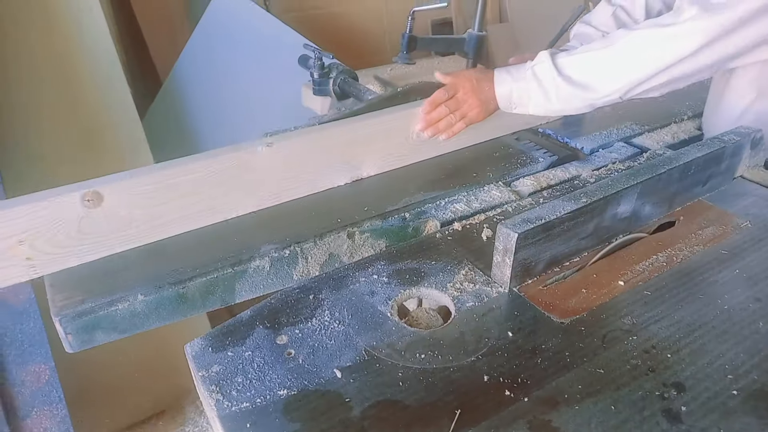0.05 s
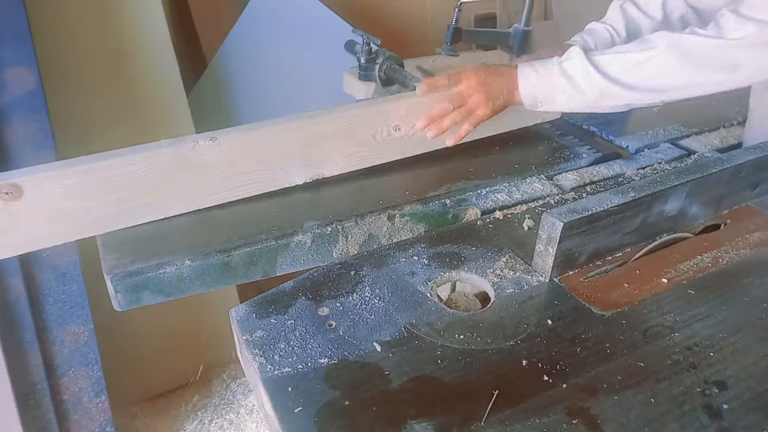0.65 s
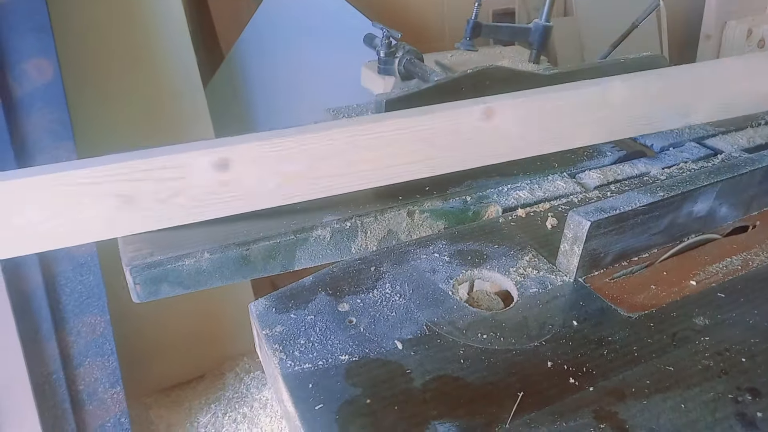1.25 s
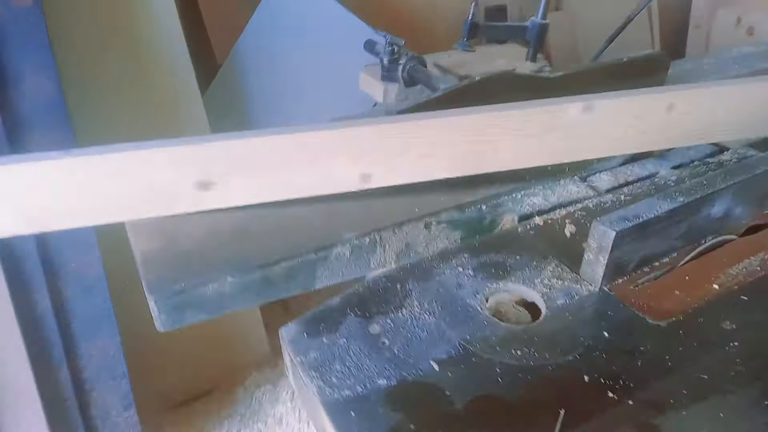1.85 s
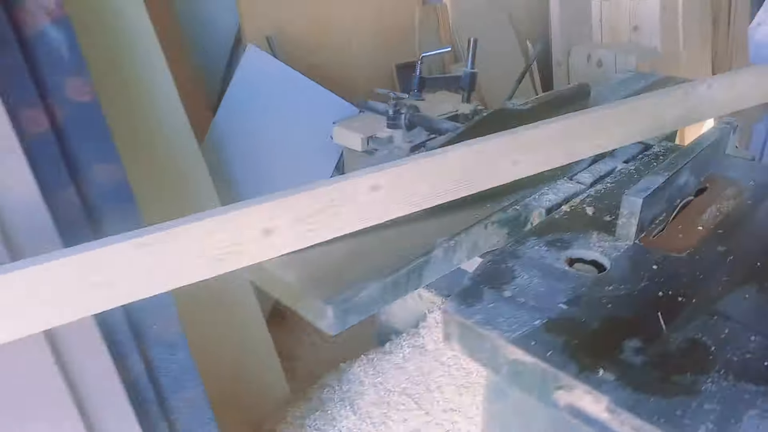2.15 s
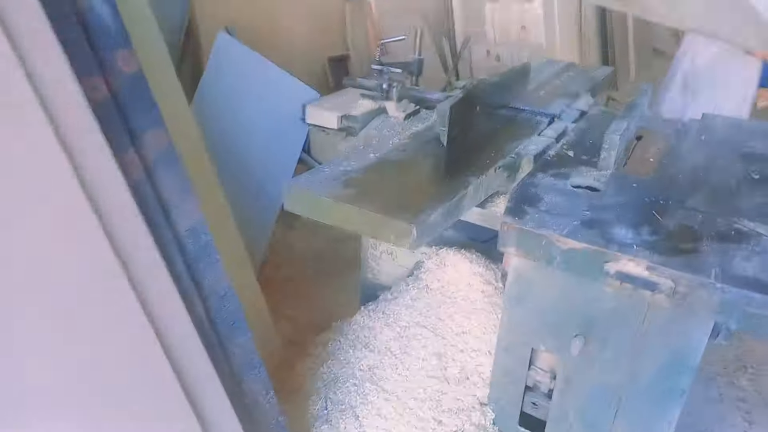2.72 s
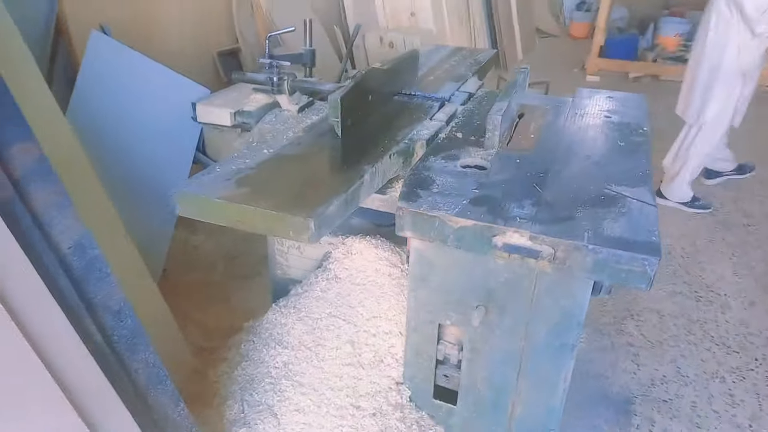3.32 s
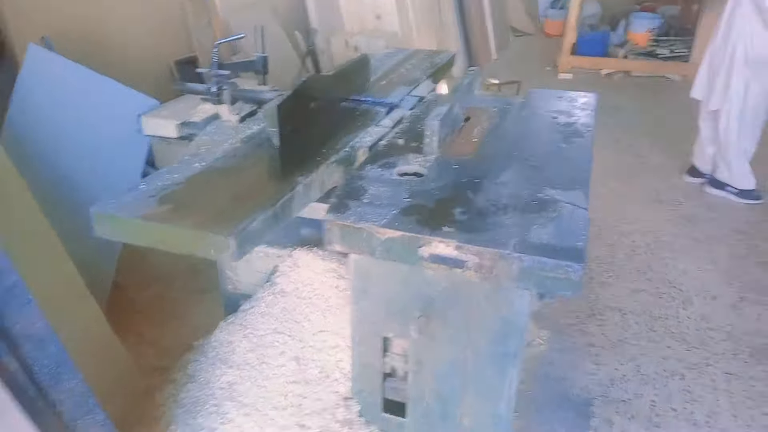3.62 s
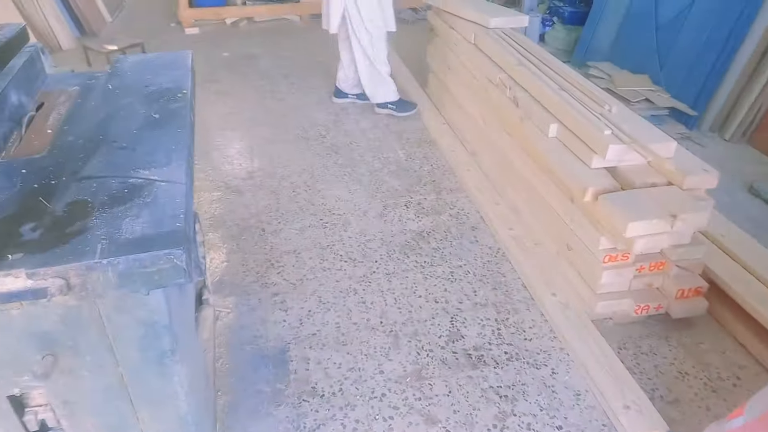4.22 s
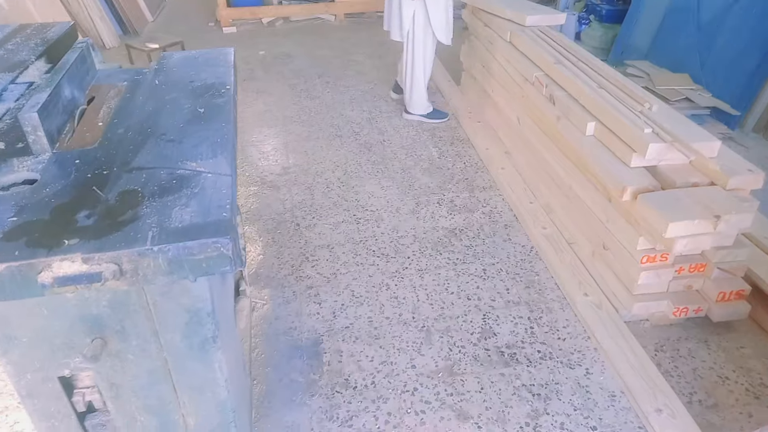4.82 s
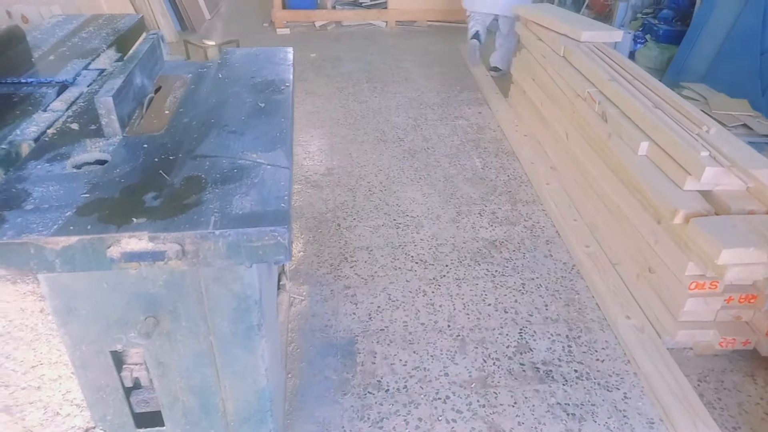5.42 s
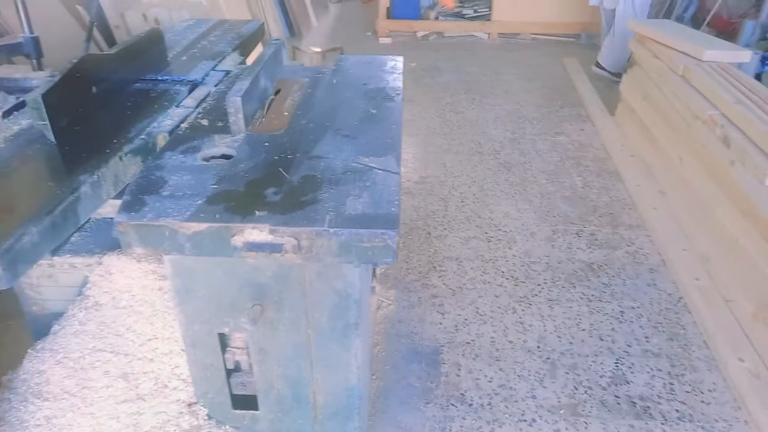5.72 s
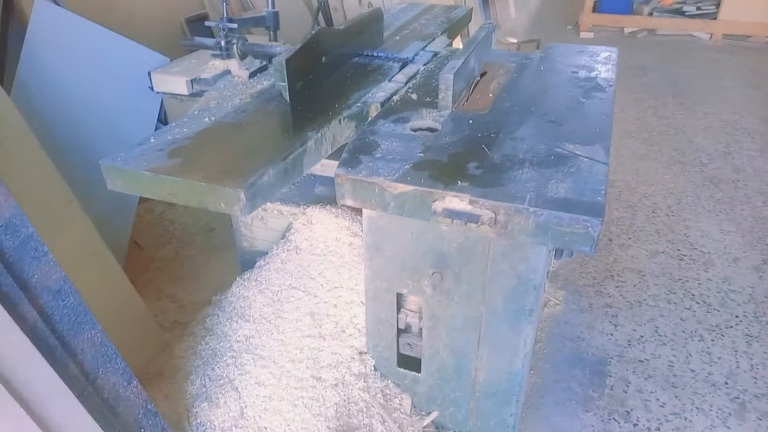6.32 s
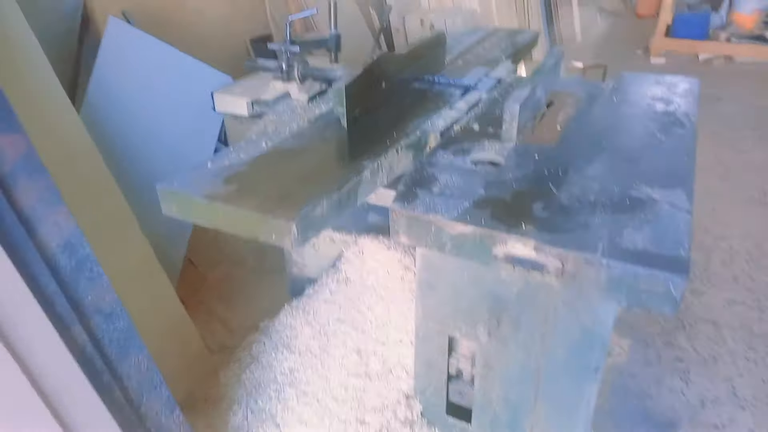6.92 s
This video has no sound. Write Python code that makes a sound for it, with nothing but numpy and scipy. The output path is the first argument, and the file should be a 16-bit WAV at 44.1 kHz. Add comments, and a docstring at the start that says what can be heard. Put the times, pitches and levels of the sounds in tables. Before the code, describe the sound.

A short buzzing cut on a workshop planer gives way to a steady motor hum and whir, broken by one sharp wooden clatter.

```python
"""A belt-driven planer in a workshop. First its knives chop the last of a plank: shearing, chatter, chips.
Air then roars in the gap under the wood and whistles as it is lifted off. The cutterhead hums on,
with whining bearings and a rumbling drive. At 4.1 s the plank clatters onto the floor; near the end,
timber clicks further away. A gain control ducks the hum under the cut and the clatter."""
import sys
import numpy as np
from scipy import signal
from scipy.fft import rfft, irfft
from scipy.io import wavfile
from scipy.ndimage import uniform_filter1d, minimum_filter1d

SR = 44100
rng = np.random.default_rng(int(sys.argv[2]) if len(sys.argv) > 2 else 0)


def unload_wav(signal):
    """Save mono or channel-first audio to the path in sys.argv[1] as 16-bit WAV at rate SR, clipped to [-1, 1]."""
    wavfile.write(
        sys.argv[1],
        SR,
        np.round(np.clip(np.atleast_2d(signal).T, -1, 1) * 32767).astype(np.int16),
    )


N = 310930
TIME = np.arange(N) / SR

# cutterhead rotation: t/s, f/Hz
HEAD_SPEED = [(0, 96.08), (.38, 96.1), (.6, 96.3), (4, 96.35), (5.5, 96.45), (7.05, 96.3)]
# plank over the cutterhead: t/s, cover/0-1
PLANK_COVER = [(.45, 0.98), (.6, 0.86), (.85, 0.6), (1.1, 0.8), (1.35, 0.93), (1.7, 1), (2, 0.44),
               (2.3, 0.3), (2.6, 0.03)]
# the listener moves and turns, so the slot faces toward and away: t/s, right-ear delay/ms, beam level/dB
ASPECT = [(2.1, .05, 2.5), (2.35, 0.058, -4.5), (2.7, 0.24, 1), (3.25, 0.22, -3.5), (3.9, 0.26, -1),
          (5.2, 0.35, 1), (6.2, 0.13, 0), (7.05, 0.19, -0.5)]
# left-right likeness: f/Hz, coherence/0-1
COHERENCE = [(25, 0.13), (70, 0.56), (300, 0.78), (600, 0.35), (1100, 0.064), (2500, 0.13), (5000, 0.043),
             (16000, 0.21)]
# ringing wood: f/Hz, level/dB
WOOD_SPECTRUM = [(250, -22), (650, -3), (1100, -2.5), (1700, -1.5), (2400, 0.5), (3000, -14), (3700, -22),
                 (4800, -32), (6400, -32), (7500, -44), (16000, -45)]
# chip spray and splinters: f/Hz, level/dB
SPRAY_SPECTRUM = [(2000, -8), (6500, 1.5), (7500, -20.5), (9500, -17), (12000, -11.5), (13600, -12),
                  (15500, 5.5), (16000, 2)]


def from_db(db):
    """Decibels to gain."""
    return 10 ** (np.asarray(db) / 20)


def unit_rms(x):
    """Scale to rms 1."""
    return x / np.sqrt(np.mean(x ** 2) + 1e-20)


def in_time(rows):
    """Each value column of a time table, per sample."""
    t_s, *columns = np.transpose(rows)
    return [np.interp(TIME, t_s, column) for column in columns]


def envelope(levels, trim_db=0):
    """Gain per sample from a level table."""
    return from_db(in_time(levels)[0] + trim_db)


def at_hz(points, hz):
    """Interpolate over log frequency."""
    f_hz, value = np.transpose(points)
    return np.interp(np.log(np.maximum(hz, 1)), np.log(f_hz), value)


def drift(rate_hz):
    """Smooth random wander, rms 1."""
    hop, settle = 40, 2000
    pole = np.exp(-2 * np.pi * rate_hz * hop / SR)
    slow = signal.lfilter([1], [1, -2 * pole, pole * pole], rng.standard_normal(N // hop + settle + 2))
    slow = unit_rms(slow[settle:])
    return np.interp(np.arange(N) / hop, np.arange(len(slow)), slow)


def pan_gains(hz):
    """Left and right gains by frequency."""
    # f/Hz, left minus right/dB
    balance = [(25, -4.5), (120, 2.5), (300, -1), (600, 2.5), (1200, 1.5), (2500, 0), (5000, 3),
               (9000, 2.5), (15000, -5)]
    return from_db(at_hz(balance, hz) * np.array([[.5], [-.5]]))


def coloured(pair, spectrum):
    """Two unrelated signals to shaped stereo, diffuse in the treble; rms 1."""
    hz = np.arange(N // 2 + 1) * SR / N
    alike = at_hz(COHERENCE, hz)
    mid, side = rfft(pair)
    stereo = np.sqrt(1 + alike) * mid + np.sqrt(1 - alike) * side * [[1], [-1]]
    return unit_rms(irfft(stereo * pan_gains(hz) * from_db(at_hz(spectrum, hz)), N))


def noise(spectrum):
    """Shaped stereo noise, rms 1."""
    return coloured(rng.standard_normal((2, N)), spectrum)


def resonance(hz, width_hz):
    """One resonance driven by turbulence or friction; rms 1."""
    b, a = signal.iirpeak(hz, hz / width_hz, fs=SR)
    return unit_rms(signal.lfilter(b, a, signal.lfilter(b, a, rng.standard_normal((2, N)))))


def tone(phase, hz, flutter, flutter_hz, spread, sway_db=0.2):
    """Fluttering line; standing waves in the room set its phase and sway it between the ears."""
    shared = 1 + flutter * (drift(flutter_hz) + 1j * drift(flutter_hz))
    diffuse = np.sqrt(1 - at_hz(COHERENCE, hz)) * np.array([[1], [-1]])
    sway = from_db(sway_db * diffuse * drift(1.0))
    skew_rad = 1.33 * spread * diffuse * drift(0.8)
    carrier = np.exp(1j * (phase + skew_rad + 2 * np.pi * rng.random()))
    return unit_rms(np.real(shared * sway * carrier) * pan_gains(hz))


def burst_power(start_s, db, t60_s, attack_s=.002):
    """Power of a blow: fast rise, exponential decay."""
    age_s = np.maximum(TIME - start_s, 0)
    attack = np.minimum(age_s / attack_s, 1)
    return (attack * from_db(db) * np.exp(-np.log(1000) * age_s / t60_s)) ** 2


def half_open(peak_cover=0.43, cover_width=0.13):
    """Ringing of the gap as the plank lifts, 0-1."""
    cover, = in_time(PLANK_COVER)
    return np.exp(-((cover - peak_cover) / cover_width) ** 2)


def from_the_left(x):
    """Sound from the left reaches the right ear later."""
    delay_s = in_time(ASPECT)[0] / 1000
    return np.array([x[0], np.interp(TIME - delay_s, TIME, x[1])])


def rumble():
    """A low mono rumble swells briefly."""
    # t/s, level/dB
    swell = [(4.8, -55), (5.25, -17.5), (5.85, -21.5), (6.4, -57)]
    return envelope(swell) * resonance(hz=134, width_hz=83)[0]


def drive():
    """Belt, pulleys and motor shake the frame at their own steady rates."""
    # f/Hz, relative level/dB
    drive_lines = [(24, -21.5), (33.3, -5), (48.4, -7), (69.5, -20.5), (73.3, -6), (121, -21),
                   (144.5, -11.5), (311, -14.5), (348.6, -16.5), (623, -19.5)]
    # frame shaking: t/s, level/dB
    shake = [(.3, -11), (.75, -28), (1.1, -17.5), (2.2, -17.5), (3.4, -13), (4.7, -19.5), (5.3, -13.5),
             (5.9, -17.5), (7.05, -17.5)]
    lines = sum(from_db(db) * tone(2 * np.pi * hz * TIME, hz, flutter=0.1, flutter_hz=3.1, spread=0.99)
                for hz, db in drive_lines)
    return envelope(shake, trim_db=-.3) * lines


def whine(hz, orders, levels, wobble_hz, surge_db=3.0, cage_hz=6.9):
    """Rolling balls sing a series of lines that waver together and surge as the cage turns."""
    phase = 2 * np.pi * np.cumsum(hz + wobble_hz * drift(2.4)) / SR
    lines = sum(from_db(db) * tone(k * phase, k * hz, flutter=0.2, flutter_hz=22, spread=0.22, sway_db=3.5)
                for k, db in orders)
    surge = from_db(surge_db * np.sin(2 * np.pi * cage_hz * TIME + drift(5.3)))
    return envelope(levels) * surge * lines


def bearing_whistle(hz, levels, halo_db, halo_hz, halo_width_hz):
    """One bearing line stands out, with a narrow breathy resonance beside it."""
    line = tone(2 * np.pi * hz * TIME, hz, flutter=0.095, flutter_hz=13, spread=0.25, sway_db=4)
    return envelope(levels) * (line + from_db(halo_db) * resonance(halo_hz, halo_width_hz))


def bearings(front_hz=391.4, rear_hz=348.7):
    """Both bearings whine; single lines swell on their own."""
    # whine series: order, relative level/dB
    front_orders = [(4, -12.5), (5, -6), (7, -1.5), (8, -8)]
    rear_orders = [(5, -4.5), (6, -2), (7, -0.5), (14, -7)]
    # whole series: t/s, level/dB
    front_whine = [(0, -37), (.8, -36), (1.7, -35), (1.95, -37), (2.6, -52)]
    rear_whine = [(1.8, -49), (2.1, -40), (2.5, -41), (2.75, -40), (3.15, -40), (3.5, -46), (3.7, -39),
                  (5.2, -44), (5.5, -61)]
    # single lines: t/s, level/dB
    front_line = [(.5, -48), (1.12, -37), (1.25, -31.5), (1.4, -47), (1.5, -30), (1.75, -31), (1.84, -31),
                  (1.93, -61), (2.4, -64)]
    rear_line = [(.5, -47), (1.05, -39), (1.4, -40), (1.9, -48), (2.3, -46), (2.6, -41), (2.85, -33),
                 (3.45, -33.5), (3.65, -39), (3.82, -35), (4, -40), (4.45, -37), (4.7, -41), (5.2, -37),
                 (5.35, -55)]
    upper_line = [(1.6, -53), (2.1, -41.5), (2.45, -45), (2.75, -38), (3.1, -41), (3.35, -34), (3.52, -39),
                  (3.65, -50), (5.2, -48), (5.5, -60)]
    front = whine(front_hz, front_orders, front_whine, wobble_hz=0.344)
    rear = whine(rear_hz, rear_orders, rear_whine, wobble_hz=0.297)
    front += bearing_whistle(6 * front_hz, front_line, halo_db=-12.5, halo_hz=2420, halo_width_hz=40)
    rear += bearing_whistle(8 * rear_hz, rear_line, halo_db=-2.5, halo_hz=2776, halo_width_hz=32)
    top_hz = 10 * rear_hz
    upper = tone(2 * np.pi * top_hz * TIME, top_hz, flutter=0.19, flutter_hz=13, spread=0.28, sway_db=2.5)
    return front + rear + envelope(upper_line) * upper


def air_whistle(half_open_db=-34):
    """Air whistles under the plank, most with the gap half open, and rings the guard and tables."""
    # covered gap: t/s, level/dB
    gap_level = [(.35, -50), (.5, -38), (.85, -47), (1.15, -49), (1.35, -35), (1.9, -35), (2.5, -53)]
    # guard and tables: f/Hz, width/Hz, level/dB
    table_modes = [(3024, 50, -48.5), (3590, 28, -47.5), (5350, 70, -50.5)]
    gap = (envelope(gap_level) + from_db(half_open_db) * half_open()) * resonance(hz=836, width_hz=16)
    return gap + sum(from_db(db) * resonance(hz, width_hz) for hz, width_hz, db in table_modes)


def air_roar(turn_rad, free_db=-18, trapped_db=-22, treble_db=-24.5):
    """Air puffs with each turn, roars under the plank and hisses up to 7 kHz. Apart from the air, a faint thin
    sizzle sits at 14-16 kHz."""
    # open head, gap under the plank: f/Hz, level/dB
    roar_spectrum = [(15, -29.5), (40, -2), (100, 6.5), (135, -1.5), (260, -0.5), (400, -3.5), (540, -4),
                     (680, -11), (900, -9.5), (1250, -11.5), (1600, -25), (4000, -61.5)]
    gap_spectrum = [(100, 2.5), (170, -1.5), (270, -2), (350, -6), (430, 0.5), (540, -7), (660, -12.5),
                    (750, -8), (810, -3), (900, -12.5), (1200, -11), (1600, -41), (4000, -56.5)]
    # hiss up to 7 kHz, and a faint thin sizzle at 14-16 kHz: f/Hz, level/dB
    treble_spectrum = [(300, -9.5), (1100, -0.5), (1500, 0), (2300, 1), (2800, -1.5), (3300, -4),
                       (4200, -4), (4750, -10), (4950, -5), (5150, -8.5), (5900, -7.5), (6600, -15.5),
                       (7300, -38.5), (13800, -30), (15000, -23), (16000, -19)]
    # inrush as the wood clears the knives: t/s, level/dB
    rush_level = [(.37, -50), (.42, -21), (.53, -15.5), (.62, -22), (.72, -46)]
    cover, = in_time(PLANK_COVER)
    boost_db = 8.5 * cover
    swing_db = 0.5 * cover + 0.4 * in_time(ASPECT)[1]
    puffs = 1 + 0.091 * np.cos(turn_rad) + 0.067 * np.sin(2 * turn_rad) - 0.13 * np.cos(3 * turn_rad)
    free = np.sqrt(1 - cover) * from_db(free_db + boost_db) * noise(roar_spectrum)
    trapped = np.sqrt(cover) * from_db(trapped_db + boost_db) * noise(gap_spectrum)
    hiss_and_sizzle = from_db(treble_db + swing_db + .5 * drift(5.5)) * noise(treble_spectrum)
    rush = envelope(rush_level) * noise(roar_spectrum)
    return (free + trapped + rush + hiss_and_sizzle) * unit_rms(puffs)


def cutterhead(turn_rad, beam_above_hz=430):
    """Imbalance drones once a turn; three knives pass the table lips, adding orders the plank colours."""
    # orders 1, 3 and 5: t/s, level/dB
    drone_level = [(.25, -18.5), (.6, -16), (.8, -17.5), (1.13, -22), (1.27, -16), (1.4, -25),
                   (1.65, -21.5), (1.88, -17), (2.8, -20.5), (4.4, -22.5), (5.3, -16), (5.45, -32),
                   (5.8, -14), (5.95, -30), (6.02, -12), (6.35, -16.5), (6.44, -24), (6.57, -19)]
    knife_level = [(.1, -23.5), (.5, -23), (1.2, -32), (1.35, -22.5), (1.65, -35), (1.75, -21.5),
                   (1.95, -22.5), (2.35, -15.5), (3.2, -23.5), (3.7, -16), (4.05, -17), (4.4, -18),
                   (5.6, -17.5), (7.05, -20)]
    fifth_level = [(.1, -28), (.45, -23), (.8, -26), (1.3, -23), (2, -21), (2.2, -38), (2.55, -28),
                   (3.2, -44.5), (3.95, -27), (5, -24.5), (5.6, -26), (7.05, -27.5)]
    # order, open level/dB, covered level/dB, half-open boost/dB
    overtones = [(2, -20.5, -32.5, -2), (4, -33, -21.5, 4), (6, -26, -35, 8), (7, -41.5, -43, 3.5),
                 (8, -29.5, -33.5, -1.5), (9, -37.5, -39, 4), (10, -36.5, -46, 0), (11, -43.5, -40.5, -8),
                 (12, -35.5, -53, -1.5), (13, -33, -41, -7), (14, -57, -43, -2)]
    hz = np.mean(np.array(HEAD_SPEED)[:, 1])
    cover, = in_time(PLANK_COVER)
    beam_db, ringing = in_time(ASPECT)[1], half_open()
    drone = tone(turn_rad, hz, flutter=0.17, flutter_hz=3.8, spread=0.12)
    knives = tone(3 * turn_rad, 3 * hz, flutter=0.094, flutter_hz=4.2, spread=0.059)
    fifth = tone(5 * turn_rad, 5 * hz, flutter=0.26, flutter_hz=7.4, spread=0.32)
    out = envelope(drone_level, trim_db=1.5) * drone
    out += envelope(knife_level, trim_db=1.8) * knives
    out += envelope(fifth_level) * fifth
    for k, open_db, covered_db, ring_db in overtones:
        level_db = open_db + cover * (covered_db - open_db) + ringing * ring_db
        level_db += beam_db * (k * hz > beam_above_hz)  # the slot beams the upper tones
        line = tone(k * turn_rad, k * hz, flutter=0.28, flutter_hz=6.9, spread=0.14, sway_db=2.5)
        out += from_db(level_db) * line
    return out


def handling():
    """The plank slides through the hands, rubs along the stack and settles with a tiny tick."""
    # wood and cloth: t/s, half length/s, level/dB
    swishes = [(1.04, .05, -53), (1.47, .06, -47), (2.44, .05, -55), (3.52, .06, -55), (3.877, .1, -54),
               (4.294, .07, -54)]
    # t/s, level/dB
    rub_level = [(3.55, -65), (3.68, -36), (3.9, -35.5), (3.98, -28), (4.1, -34), (4.5, -32.5), (4.65, -75)]
    swish = sum(from_db(db) * np.exp(-((TIME - t_s) / half_s) ** 2) for t_s, half_s, db in swishes)
    rub = envelope(rub_level) * resonance(hz=2143, width_hz=210)
    tick = np.sqrt(burst_power(start_s=4.203, db=-34, t60_s=.025))
    return swish * resonance(hz=9450, width_hz=4200) + rub + tick * resonance(hz=9700, width_hz=620)


def timber_clicks(scuff_db=-7, scuff_t60_s=0.052, attack_s=.001):
    """Distant boards touch on the stack: a dull scuff and a few short modes."""
    # t/s, level/dB
    clicks = [(6.641, -10), (6.648, -18), (6.663, -15), (6.949, -18)]
    # f/Hz, relative level/dB, t60/s
    modes = [(2070, -20, .05), (2600, -6, 0.076), (3000, -8, 0.086), (3030, -8, 0.065), (3770, -12, .05)]
    scuff_power = sum(burst_power(t_s, db + scuff_db, scuff_t60_s) for t_s, db in clicks)
    out = np.sqrt(scuff_power) * noise(WOOD_SPECTRUM)
    age_s = TIME[:SR // 12]
    attack = np.minimum(age_s / attack_s, 1)
    for t_s, db in clicks:
        start = int(t_s * SR)
        for hz, mode_db, t60_s in modes:
            ring = np.sin(2 * np.pi * (hz * age_s + rng.random((2, 1))))
            decay = np.exp(-np.log(1000) * age_s / t60_s)
            out[:, start:start + len(age_s)] += from_db(db + mode_db) * attack * decay * ring
    return out


def plank_drop(crack_t60_s=0.14, room_db=-17, room_t60_s=0.42):
    """The plank slaps flat on the floor with a bright snap and bounces; a duller ring hangs in the room."""
    # t/s, crack level/dB, ring level/dB, ring t60/s
    impacts = [(4.104, -5, -5, 0.16), (4.109, 0, -8, 0.28), (4.127, -16, -18, .12), (4.146, -12, -13, .12),
               (4.16, -13, -9, 0.19), (4.184, -16.5, -9, 0.13), (4.203, -17, -12, .1),
               (4.254, -30, -27, 0.08)]
    # f/Hz, level/dB
    snap_spectrum = [(250, -29), (1500, -3), (2800, -2), (3700, 12), (5000, -5), (7500, -27), (10000, -21),
                     (15000, -17), (16000, -28)]
    crack_spectrum = [(250, -25), (800, -12), (1300, 8), (2300, -1), (3000, 0), (3700, 1), (4800, -5.5),
                      (6400, -10.5), (7500, -41), (16000, -42)]
    snap = burst_power(start_s=4.11, db=1, t60_s=0.036)
    crack = sum(burst_power(t_s, db, crack_t60_s) for t_s, db, _, _ in impacts)
    ring = sum(burst_power(t_s, db, t60_s) + burst_power(t_s, db + room_db, room_t60_s)
               for t_s, _, db, t60_s in impacts)
    layers = (snap, snap_spectrum), (crack, crack_spectrum), (ring, WOOD_SPECTRUM)
    return sum(np.sqrt(power) * noise(spectrum) for power, spectrum in layers)


def splinters(t60_s=.012):
    """The last fibres snap off the plank's end."""
    # t/s, level/dB
    snaps = [(.174, -11), (.229, -10), (.271, -9), (.335, -10), (.369, -5), (.387, -11), (.396, -14)]
    return np.sqrt(sum(burst_power(t_s, db, t60_s) for t_s, db in snaps)) * noise(SPRAY_SPECTRUM)


def bites(turn_rad, decay_turns, repeat, sustain, uneven_db, scatter_turns=0.01, strike_turns=.22):
    """The proudest knife bites once a turn, early or late with the grain: part repeated, part fresh."""
    cycle = turn_rad / (2 * np.pi) % 1
    period = int(SR / HEAD_SPEED[0][1])
    repeated = rng.standard_normal((2, period))[:, (cycle * period).astype(int) % period]
    fibres = np.sqrt(repeat) * repeated + np.sqrt(1 - repeat) * rng.standard_normal((2, N))
    age_turns = (cycle - strike_turns + scatter_turns * drift(40)) % 1
    return fibres * (np.exp(-age_turns / decay_turns) + sustain) * from_db(uneven_db * drift(60))


def buzz(phase, spectrum, top_order, scatter_rad, uneven_db=1.7, size=2048):
    """Repeated blows buzz the wood, harmonics 3 and up; the grain roughens timing and strength."""
    orders = np.arange(3, top_order + 1)[:, None, None]
    grid = 2 * np.pi * np.arange(size) / size
    one_cycle = np.cos(orders * grid + 2 * np.pi * rng.random((len(orders), 2, 1))).sum(axis=0)
    rough_phase = phase + scatter_rad * drift(45)
    pair = [np.interp(rough_phase, grid, side, period=2 * np.pi) for side in one_cycle]
    return coloured(pair, spectrum) * from_db(uneven_db * drift(50))


def cut(turn_rad, grain_scatter_rad=.009):
    """One knife rasps the fibres and sets the plank chattering; in deep bites all three buzz, chips fly."""
    # t/s, shear level/dB, chip level/dB, spray level/dB
    cut_levels = [(0, -7.5, -19.5, -46), (.125, -8.5, -30, -48), (.17, -14, -15, -36), (.235, -9, -16, -19),
                  (.28, -26, -7.5, -14), (.335, -18, -19, -13), (.385, -16, -22, -16.5),
                  (.405, -34, -16, -41), (.45, -58, -58, -70)]
    # t/s, level/dB
    buzz_level = [(.11, -30), (.165, -18), (.23, -23), (.28, -13), (.33, -28), (.39, -38), (.45, -70)]
    chatter_level = [(0, -23), (.115, -35), (.16, -5.5), (.2, -17), (.24, -16), (.3, -20), (.36, -29),
                     (.42, -65)]
    # f/Hz, level/dB
    shear_spectrum = [(600, -14), (2000, -5), (3300, -14.5), (3880, 3), (4250, -10.5), (5400, 3.5),
                      (6050, 5.5), (6600, -12), (7500, -36), (13500, -22.5), (15000, -26.5), (16000, -2)]
    chip_spectrum = [(200, -12), (450, -1), (850, -1), (1300, -7), (1700, -6.5), (2050, 4.5), (2400, -2),
                     (3000, -5.5), (3900, 2.5), (4500, -6), (6000, -1), (6700, -16.5), (7500, -35.5),
                     (16000, -17.5)]
    buzz_spectrum = [(865, 8.5), (1150, -3.5), (1730, -2.5), (2020, -5.5), (2300, -11), (2600, -1.5),
                     (2900, -10.5), (3900, -6), (4400, -9), (4950, -11), (5600, -7), (6100, -8.5)]
    chatter_spectrum = [(290, 5.5), (385, 8), (480, 3.5), (577, 0.5), (670, -13), (770, -4.5),
                        (1000, -11.5), (1440, -2), (1540, -9.5), (1730, -1.5), (1950, -13), (2210, -5.5),
                        (3200, -16.5), (3850, -10.5), (4200, -13), (4450, -6.5), (4700, -2), (4820, -10.5),
                        (5000, -4), (5200, -11.5), (6050, 1.5), (6350, -15.5), (7000, -19.5)]
    shear_db, chip_db, spray_db = in_time(cut_levels)
    shear = bites(turn_rad, decay_turns=0.11, repeat=0.61, sustain=0.15, uneven_db=2.0)
    chips = bites(turn_rad, decay_turns=0.92, repeat=0.42, sustain=0.86, uneven_db=2.0)
    knives = buzz(3 * turn_rad, buzz_spectrum, top_order=21, scatter_rad=3 * grain_scatter_rad)
    chatter = buzz(turn_rad, chatter_spectrum, top_order=72, scatter_rad=grain_scatter_rad)
    spray = bites(turn_rad, decay_turns=0.3, repeat=.1, sustain=0.28, uneven_db=6.0)
    return (from_db(shear_db) * coloured(shear, shear_spectrum)
            + from_db(chip_db) * coloured(chips, chip_spectrum)
            + envelope(buzz_level) * knives
            + envelope(chatter_level) * chatter
            + from_db(spray_db) * coloured(spray, SPRAY_SPECTRUM))


def scene():
    """Machine, wood and rumble, in stereo."""
    turn_rad = 2 * np.pi * np.cumsum(in_time(HEAD_SPEED)[0]) / SR
    hum = from_the_left(cutterhead(turn_rad))
    machine = hum + drive() + bearings() + air_roar(turn_rad) + air_whistle()
    wood = cut(turn_rad) + splinters() + plank_drop() + timber_clicks() + handling()
    return machine + wood + rumble()


def gain_control(x, threshold_db=-19.5, slope=.62, release_db_per_s=90, ahead_s=.001,
                 sense_hz=1000, bass_hz=75):
    """Loud treble ducks all but the deep bass, with a short look-ahead."""
    treble = signal.sosfilt(signal.butter(2, sense_hz, "high", fs=SR, output="sos"), x)
    power = uniform_filter1d(np.mean(treble ** 2, axis=0), size=500)
    over_db = np.maximum(10 * np.log10(np.maximum(power, 1e-12)) - threshold_db, 0)
    ramp_db = release_db_per_s * TIME
    held_db = np.maximum.accumulate(slope * over_db + ramp_db) - ramp_db
    gain = from_db(-np.interp(TIME + ahead_s, TIME, held_db))
    bass = signal.sosfiltfilt(signal.butter(4, bass_hz, fs=SR, output="sos"), x, padtype="even")
    return bass + gain * (x - bass)


def limiter(x, window_samples=120):
    """The gain dips smoothly around peaks above full scale."""
    gain = 1 / np.maximum(np.abs(x), 1)
    return x * uniform_filter1d(minimum_filter1d(gain, window_samples), window_samples)


def record(dry):
    """Gain control, limiter, steep 15.9 kHz low-pass."""
    top_cut = signal.cheby1(12, .3, 15900, fs=SR, output="sos")
    return signal.sosfilt(top_cut, limiter(gain_control(dry)))


dry = scene()
out = record(dry)
unload_wav(out)
```